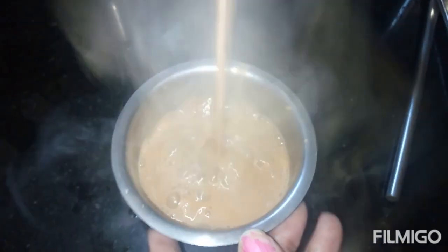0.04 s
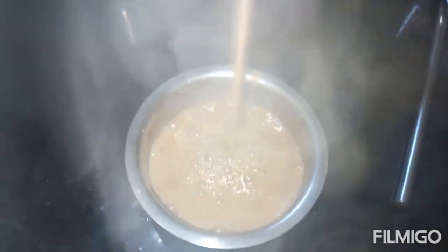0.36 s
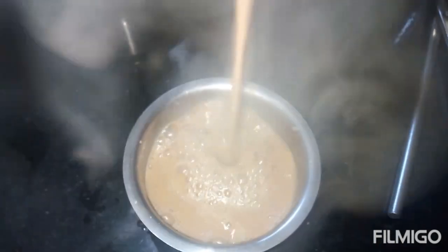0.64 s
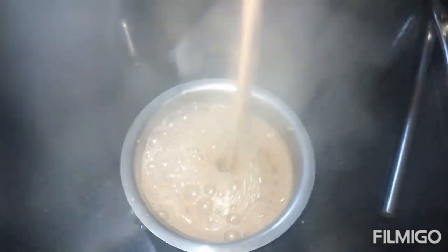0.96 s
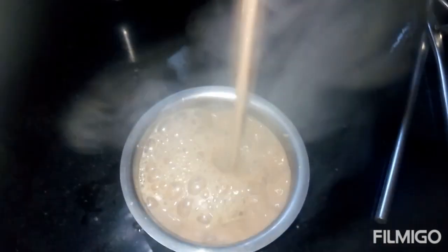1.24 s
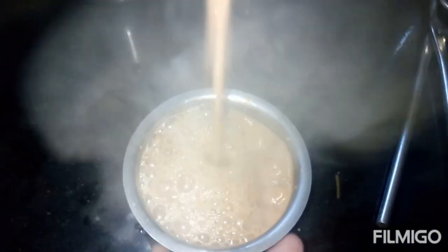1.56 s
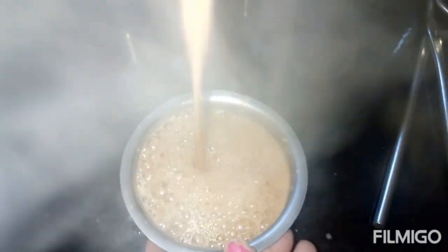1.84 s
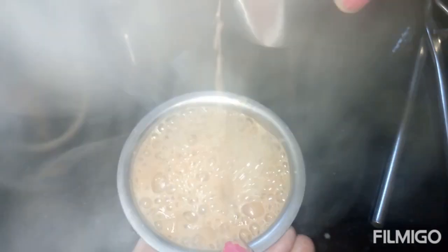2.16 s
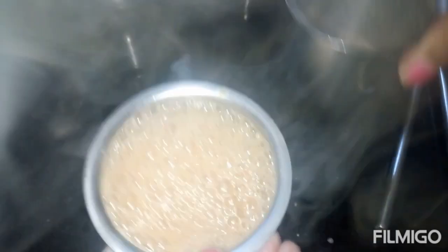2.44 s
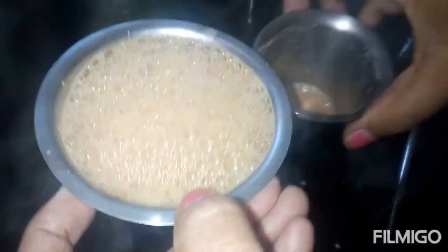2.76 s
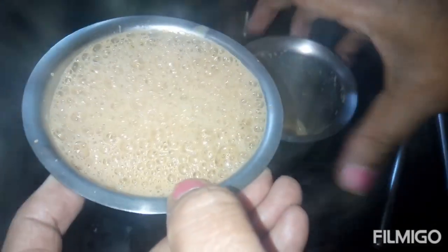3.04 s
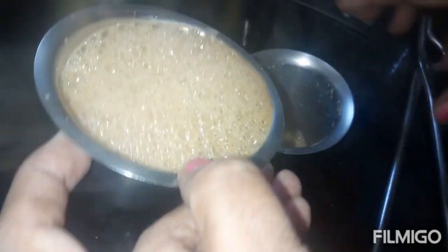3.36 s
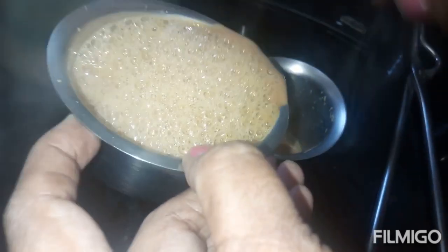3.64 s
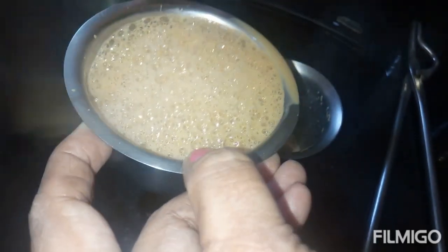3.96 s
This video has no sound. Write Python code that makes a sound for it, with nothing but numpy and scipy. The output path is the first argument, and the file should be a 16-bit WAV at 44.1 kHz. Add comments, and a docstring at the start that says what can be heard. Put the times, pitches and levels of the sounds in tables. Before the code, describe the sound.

Hot milky coffee pours into a steel cup close to the microphone, bubbling, gurgling and spitting. The stream thins and stops, then the emptied steel vessel clinks down and a dull knock follows in a quietly humming kitchen.

```python
"""A small, quietly humming kitchen, with two microphone ports close to a steel cup.
Hot milky coffee is poured in from a height: bubbles ring, gurgle and spit spray, fading as foam rises
and the stream thins. The emptied steel vessel is set down with a clink; a dull knock comes at the end.
The ports are of opposite polarity and ring near 10 kHz."""
import sys
import numpy as np
from scipy import signal
from scipy.fft import rfft, irfft, next_fast_len
from scipy.io import wavfile
from scipy.ndimage import map_coordinates

SR = 44100
rng = np.random.default_rng(int(sys.argv[2]) if len(sys.argv) > 2 else 0)


def pcm_store(signal):
    """Save signal as 16-bit PCM."""
    levels = np.round(np.clip(np.atleast_2d(signal), -1, 1) * 32767)
    wavfile.write(sys.argv[1], SR, levels.astype(np.int16).T)


N = 176400
T = np.arange(N) / SR
POUR_S, SPIT_RISE_S = 2.6, .01


def amp(db):
    """Decibels to gain."""
    return 10 ** (np.asarray(db) / 20)


def unit(x):
    """Scaled to rms 1."""
    return x / np.sqrt(np.mean(x ** 2) + 1e-20)


def along(points, hz):
    """(f/Hz, value) points read on a log axis."""
    f, v = np.transpose(points)
    return np.interp(np.log(hz + 1), np.log(f + 1), v)


def level(points):
    """Gain per sample from (t/s, level/dB) points."""
    return amp(np.interp(T, *np.transpose(points)))


def wobble(rate):
    """A smooth random curve, rate knots a second."""
    return map_coordinates(rng.standard_normal(1024), [T * rate], mode="wrap")


def filtered(x, response):
    """x times a complex response of frequency."""
    n = x.shape[-1]
    m = next_fast_len(n + SR // 4)
    return irfft(rfft(x, m) * response(np.fft.rfftfreq(m, 1 / SR)), m)[..., :n]


def coloured(x, points):
    """x through a smooth (f/Hz, gain/dB) curve."""
    return filtered(x, lambda hz: amp(along(points, hz)))


def passed(x, kind, hz):
    """x through a gentle high-pass or band-pass."""
    return signal.sosfilt(signal.butter(2, hz, kind, fs=SR, output="sos"), x)


# Diffuse sound across the two ports: f/Hz, correlation
PORT_LIKENESS = [(200, 0.94), (600, 0.49), (2500, 0.035)]
def diffuse(size):
    """Stereo noise that is alike in the bass and unrelated in the treble."""
    def mid_side(hz):
        angle = np.arccos(np.clip(along(PORT_LIKENESS, hz), -1, 1)) / 2
        return np.array([np.cos(angle), np.sin(angle)])
    mid, side = filtered(rng.standard_normal((2, size)), mid_side)
    return np.array([mid + side, mid - side])


# The kitchen's reverberation: f/Hz, t60/s
ROOM_DECAY = [(150, 1), (1200, 0.41), (11000, 0.25)]
def placed(x, lead_ms, near_db, near_t60, room_db):
    """Direct sound, left port first; short, diffuse close reflections, renewed every 0.1 s; room tail."""
    close = filtered(x, lambda hz: np.exp(1j * np.pi * hz * lead_ms / 1000 * np.array([[1], [-1]])))
    hz, t, spectrum = signal.stft(diffuse(SR // 2), SR, nperseg=256)
    decay = 1000.0 ** (-t / along(ROOM_DECAY, hz)[:, None])
    tail = signal.istft(spectrum * decay, SR, nperseg=256)[1][:, :SR // 2]
    step, scatter = SR // 10, diffuse(N)
    for i in range(0, N, step):
        near = scatter[:, i:i + step] * 1000.0 ** (-T[:step] / near_t60)
        echoes = signal.fftconvolve(x[:, i:i + step], near / np.linalg.norm(near[0]), axes=1)
        add(close, i / SR, amp(near_db) * echoes)
    return close + amp(room_db) * signal.fftconvolve(x, tail / np.linalg.norm(tail[0]), axes=1)[:, :N]


def add(track, s, sound):
    """Mix a sound in at time s."""
    part = track[..., max(round(s * SR), 0):][..., :sound.shape[-1]]
    part += sound[..., :part.shape[-1]]


# Room tone all around the microphone: f/Hz, level/dB
ROOM_TONE = [(20, -11), (90, -10), (260, 0.5), (620, -12), (1100, -11.5), (3000, -29.5), (10000, -33.5)]
def kitchen(mains_hz=106.8):
    """Soft room noise and a wavering mains hum."""
    air = amp(-48.5) * unit(coloured(diffuse(N), ROOM_TONE))
    mains = amp(-53.5 + 7.1 * wobble(4.52)) * np.sin(2 * np.pi * mains_hz * T)
    return air + mains


def bubble(t, hz, cycles, rise):
    """A damped sine that starts softly and dies within some cycles while its pitch rises."""
    age = t * hz / cycles
    phase = 2 * np.pi * hz * t * (1 + rise * np.minimum(age, 1) / 2)
    return np.sin(phase) * 1000.0 ** -age * (1 - np.exp(-t * hz))


def swarm(count, hz, sink, spread, cycles, scatter_db, size, skew_s=0.00011):
    """Stereo bubbles of random pitch, strength and place; pitch falls by sink octaves a second."""
    when, pitch_a, pitch_b, loudness, spot = rng.random((count, 5)).T[:, :, None]
    start = when * POUR_S
    detune = np.exp(spread * np.sqrt(6) * (pitch_a + pitch_b - 1))
    pitch = np.clip(hz * 2 ** (-sink * start) * detune, 100, SR / 3)
    strength = amp(-scatter_db * np.log(np.maximum(loudness, .025)))
    # bursting all over the surface, they reach the right port a little early or late
    delay = skew_s * np.array([np.ones_like(spot), 2 * spot])
    t = np.maximum(np.arange(size) / SR - delay, 0)
    rings = strength * bubble(t, pitch, cycles, rise=0.18)
    at = (start * SR).astype(int) + np.arange(size)
    ports = np.array([np.bincount(at.ravel(), port.ravel(), N) for port in rings])
    return unit(passed(ports, "high", hz / 4)) * np.sqrt(POUR_S * SR / N)


# Strength of the stream landing close to the microphone: t/s, level/dB
STREAM_FLOW = [(0, -2.5), (.77, -2.5), (1.68, -2), (2.0, -7.5), (2.3, -14), (2.42, -20.5), (2.54, -66)]
def stream(gush):
    """The stream drives small ringing bubbles into the coffee."""
    small = swarm(count=9000, hz=2750, sink=0.13, spread=0.43, cycles=8.5, scatter_db=5.0, size=400)
    return amp(-38.5) * level(STREAM_FLOW) * gush * small


# Cup and worktop drumming, close by: f/Hz, level/dB
RUMBLE_SPECTRUM = [(30, -17.5), (95, -1), (450, -18.5), (2000, -46)]
def rumble():
    """The weight of the stream drums softly on the cup and worktop."""
    weight = amp(-46.0) * level(STREAM_FLOW) ** 0.61 * amp(2.5 * wobble(8.8))
    return weight * unit(coloured(diffuse(N), RUMBLE_SPECTRUM))


# Bubble cloud down in the cup, under the stream: t/s, level/dB, f/Hz
BUBBLE_CLOUD = [(0, -50, 1520), (.6, -50, 883), (1.05, -45.5, 641), (1.85, -49.5, 605), (2.55, -64, 436)]
def gurgle(gush, q=2.65, leak_db=-44):
    """Deep bubbles sound through their cloud's resonance, which sinks as the cloud grows."""
    deep = swarm(count=4500, hz=1182, sink=0.57, spread=0.47, cycles=5.9, scatter_db=2.0, size=800)
    s, db, hz = np.transpose(BUBBLE_CLOUD)
    centres = np.geomspace(hz.min(), hz.max(), num=8)
    position = np.interp(np.log(np.interp(T, s, hz)), np.log(centres), np.arange(len(centres)))
    cloud = amp(leak_db) * deep
    for k, centre in enumerate(centres):
        band = passed(deep, "band", centre * np.exp(np.array([-.5, .5]) / q))
        crossfade = np.sqrt(np.maximum(1 - np.abs(position - k), 0))
        cloud += crossfade * unit(band)
    return gush * amp(np.interp(T, s, db)) * cloud


# Spray above the cup: f/Hz, gain/dB
SPRAY_COLOUR = [(200, -14), (900, -2), (2500, -1.5), (5000, -1), (14000, -14.5)]
def spray(gush):
    """Tiny drops and hiss flicker with the stream."""
    drops = swarm(count=3600, hz=9460, sink=0, spread=0.25, cycles=2.9, scatter_db=6.0, size=64)
    fizz = unit(coloured(drops + amp(-4.5) * rng.standard_normal((2, N)), SPRAY_COLOUR))
    return amp(-40.5) * level(STREAM_FLOW) * gush * amp(1.7 * wobble(90)) * fizz


def plop(hz):
    """A wet slap, a main bubble and, within a few milliseconds, the smaller ones that it sheds."""
    t = T[:SR // 20]
    shed = sum(bubble(np.maximum(t - 0.0053 * delay ** 2, 0), hz * 2 ** (1.63 * height - .3),
                      cycles=12.0, rise=0.063) for delay, height in rng.random((4, 2)))
    slap = unit(passed(rng.standard_normal(len(t)), "band", [1000, 4200])) * 1000.0 ** (-t / 0.017)
    return bubble(t, hz, cycles=13.1, rise=0.033) + amp(-13.5) * shed + amp(-11) * slap


def spit(width_s):
    """A stereo click inside a brief flurry that peaks after SPIT_RISE_S."""
    t = T[:SR // 20] - SPIT_RISE_S
    click = np.exp(-np.abs(t) / width_s)
    flurry = amp(-36) * np.exp(-np.abs(t) / np.where(t < 0, .0025, .005))
    noise = (rng.standard_normal(len(t)) + rng.standard_normal((2, len(t)))) / np.sqrt(2)
    return (click + flurry) * noise


# Single splashes in the cup: t/s, plop level/dB, plop f/Hz, spit level/dB
SPLASH_EVENTS = [(0.0251, -12.5, 1540, -17), (0.165, -24, 1630, -15), (0.1967, -13.5, 1610, -9),
                 (.058, -21, 3040, -15), (0.329, -13.5, 1040, -37), (0.611, -21, 3520, -11.5),
                 (0.621, -14.5, 3600, -31), (0.814, -13.5, 3030, -23), (0.982, -13.5, 3540, -9.5),
                 (1.081, -16, 610, -11), (1.2113, -30, 1880, -13.5), (1.346, -16, 2250, -19.5),
                 (1.394, -14, 3020, -25), (1.5822, -18.5, 2580, -19.5), (1.6408, -27, 2800, -8.5),
                 (1.7598, -47, 2680, -14)]
# Their spits at close range: f/Hz, gain/dB
SPIT_COLOUR = [(600, -13.5), (2800, -1), (5200, -10), (8500, -3)]
def splashes():
    """Each larger splash plops in the liquid and spits above it."""
    plops, spits = np.zeros((2, 2, N))
    for s, plop_db, hz, spit_db in SPLASH_EVENTS:
        add(plops, s, amp(plop_db) * plop(hz))
        add(spits, s - SPIT_RISE_S, amp(spit_db) * spit(width_s=0.00042))
    return plops, coloured(spits, SPIT_COLOUR)


# Resonances of the cup and the worktop under the stream: f/Hz, width/Hz, gain/dB
CUP_RESONANCES = [(1108, 73, 2), (1592, 50, -7), (1824, 610, 0.5), (2876, 510, 1.5), (3620, 310, -7.5)]
def cup(liquid, open_db):
    """Sound from the liquid, partly straight and partly through the cup's resonances."""
    return filtered(liquid, lambda f: amp(open_db) + sum(
        amp(db) * 1j * f * width / (hz * hz - f * f + 1j * f * width)
        for hz, width, db in CUP_RESONANCES))


# Small ticks near the microphone: t/s, level/dB
TICK_EVENTS = [(2.281, -27), (2.4848, -35.5), (3.21, -37.5), (3.886, -34)]
# Their bright tone: f/Hz, gain/dB
TICK_COLOUR = [(2500, -9), (9000, -5.5)]
def ticks():
    """Foam and fingers tick as the pour ends and afterwards."""
    clicks = np.zeros((2, N))
    for s, db in TICK_EVENTS:
        add(clicks, s - SPIT_RISE_S, amp(db) * spit(width_s=0.001))
    return coloured(clicks, TICK_COLOUR)


def pour():
    """Uneven gushes drive bubbles, gurgle and spray; splashes and ticks come from the same spot."""
    gush = amp(0.43 * wobble(35.74))
    bubbles, cloud, fizz = stream(gush), gurgle(gush), spray(gush)
    plops, spits = splashes()
    surface = cup(bubbles + plops, open_db=-3) + cloud + fizz + spits + ticks()
    return placed(surface, lead_ms=0.14, near_db=-4, near_t60=0.019, room_db=-8.5)


# Modes of the emptied steel vessel: f/Hz, level/dB, t60/s
STEEL_MODES = [(907, -14.5, 0.19), (1060, -2.5, 0.093), (1110.5, -2, 0.093), (1173, -4.5, 0.1),
               (1430, -15.5, 0.15), (1892, -1.5, 0.079), (3614, -9.5, 0.066), (3710, -11, 0.091),
               (6264, -15, 0.044), (10950, -15.5, 0.025)]
# Its contacts with the worktop, close and to the left:
# t/s, level/dB, share of the free ringing time, dullness/(dB per octave), crack level/dB
WORKTOP_CONTACTS = [(2.9587, -12.5, 1, 0.5, -20), (2.9671, -16.5, 0.94, 0.5, -34),
                    (3.973, -21, 0.5, 48, -35)]
# The crack of a contact: f/Hz, gain/dB
CRACK_COLOUR = [(550, 4.5), (1100, 6.5), (2600, 2), (4100, 3.5), (5200, -15), (6400, -8)]
def vessel(rasp_hz=23.7, thud_hz=105.5, thud_t60=0.38):
    """Steel meets the worktop and rocks once; a held, soft contact rings shorter and duller."""
    ring, cracks, t = np.zeros((2, N)), np.zeros(N), T[:SR // 2]
    hz, mode_db, t60 = np.transpose(STEEL_MODES)[:, :, None]
    thud = np.sin(2 * np.pi * thud_hz * t) * 1000.0 ** (-t / thud_t60)  # the worktop's low note
    for s, db, free, dull_db, crack_db in WORKTOP_CONTACTS:
        strength = amp(db + mode_db - dull_db * np.abs(np.log2(hz / 1100)))
        # the rim chatters on the worktop, widening each mode to rasp_hz
        drift = np.cumsum(rng.standard_normal((len(hz), len(t))), 1) * np.sqrt(2 * np.pi * rasp_hz / SR)
        wave = np.sin(2 * np.pi * (hz * t + rng.random(hz.shape)) + drift)
        envelope = 1000.0 ** (-t / (t60 * free)) * (1 - np.exp(-t * hz))
        ports = amp([[1], [-1]]) * (strength * wave * envelope).sum(0)
        add(ring, s, passed(ports, "high", 800) + amp(crack_db - 17.5) * thud)
        add(cracks, s, amp(crack_db) * crack(t60=0.017, tail_db=-13.5, tail_t60=0.32))
    blows = ring + coloured(cracks, CRACK_COLOUR)
    return placed(blows, lead_ms=0.264, near_db=-5, near_t60=0.056, room_db=-7.5)


def crack(t60, tail_db, tail_t60):
    """The sharp noise of an impact, with a weaker tail."""
    t = T[:SR // 8]
    envelope = 1000.0 ** (-t / t60) + amp(tail_db) * 1000.0 ** (-t / tail_t60)
    return rng.standard_normal(len(t)) * envelope


def appliance(hz=206.5):
    """An appliance's hum swells near the end."""
    return level([(3.62, -57), (3.75, -36.5), (4, -40.5)]) * np.sin(2 * np.pi * hz * T)


def scene():
    """Everything as it reaches the two ports."""
    return pour() + rumble() + vessel() + kitchen() + appliance()


# Response of the left microphone port: f/Hz, gain/dB
LEFT_PORT = [(1700, 1), (7200, 5), (9700, 16), (11000, 13), (11800, -1), (13800, -7), (15500, -32)]
# Response of the right port: f/Hz, gain/dB
RIGHT_PORT = [(1700, -2), (2600, 2), (8500, 1), (10400, 11), (11100, 3.5), (11800, 1), (15500, -44)]
def record(dry, top_hz=15400):
    """Each port has its own colour, the right one inverted and slightly late; clipping, band limit."""
    left = coloured(dry[0], LEFT_PORT)
    right = filtered(coloured(dry[1], RIGHT_PORT), lambda hz: -np.exp(-1j * 0.27 * hz / (hz + 30)))
    return filtered(np.clip([left, right], -1, 1), lambda hz: hz < top_hz)


dry = scene()
out = record(dry)
pcm_store(out)
```